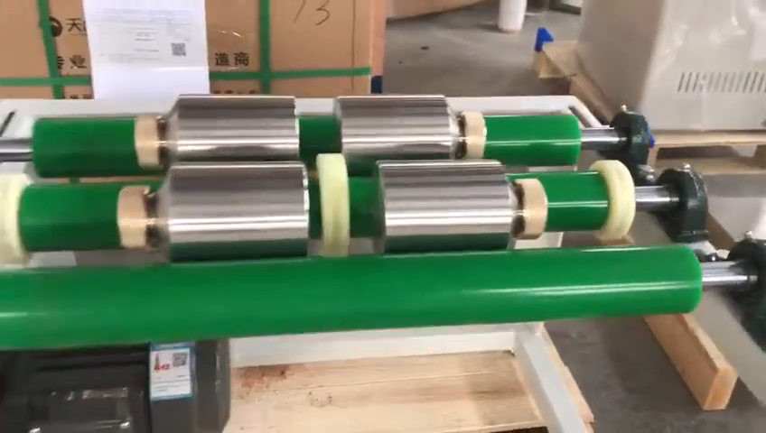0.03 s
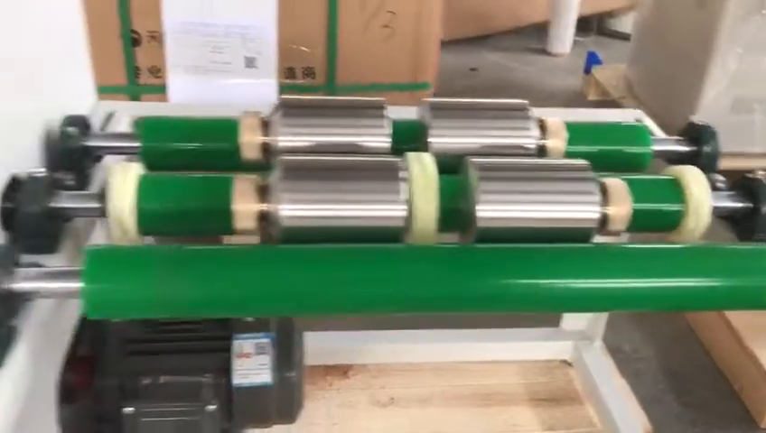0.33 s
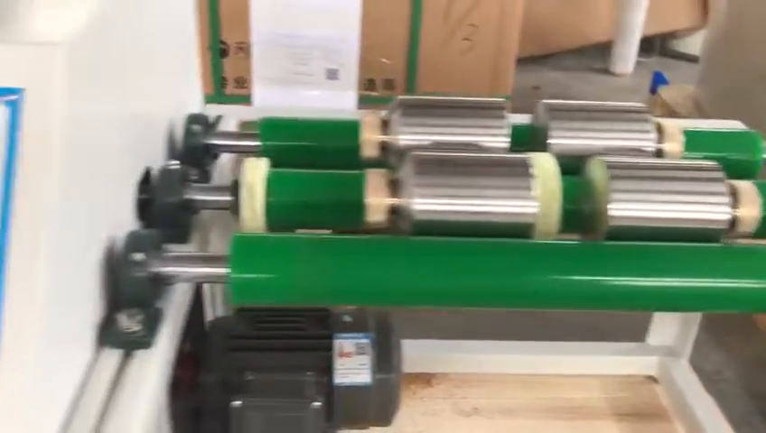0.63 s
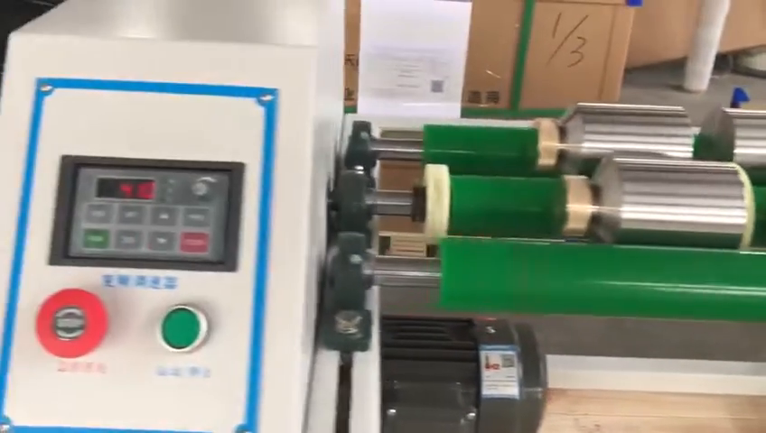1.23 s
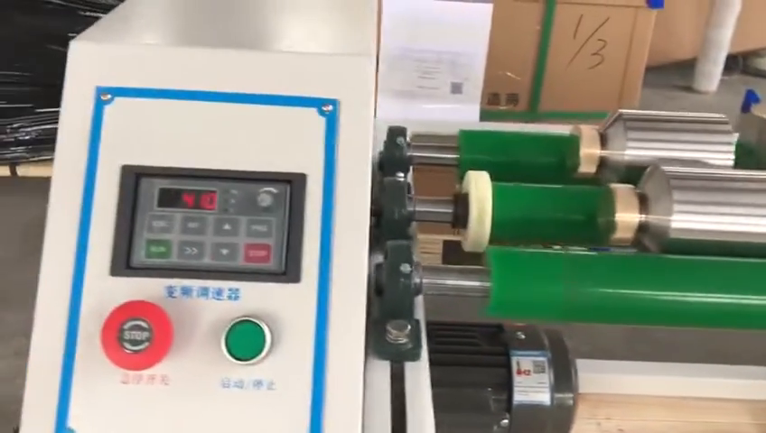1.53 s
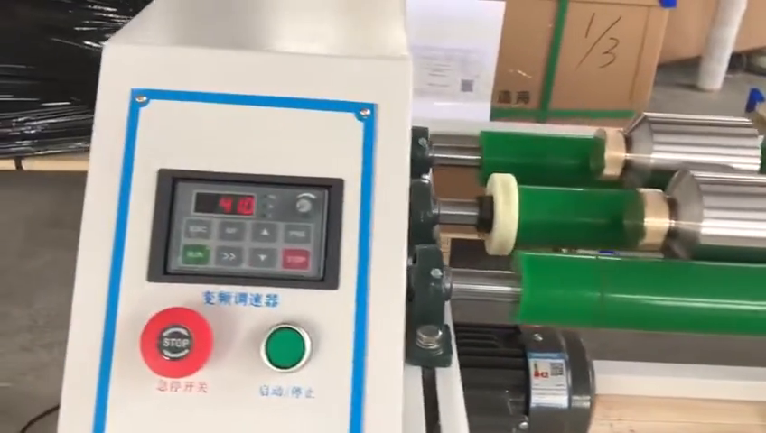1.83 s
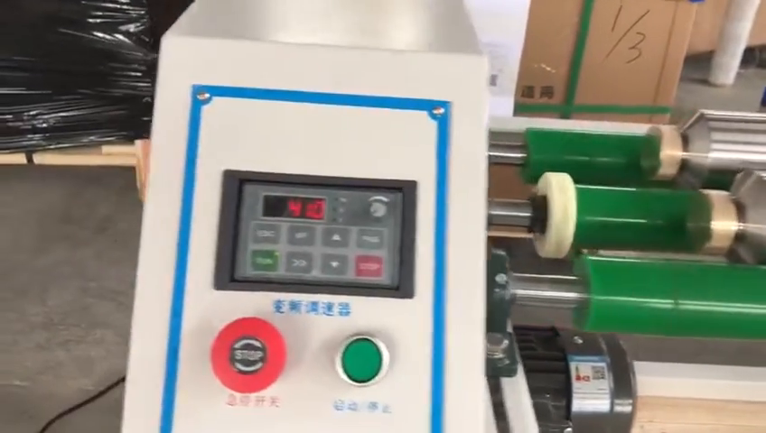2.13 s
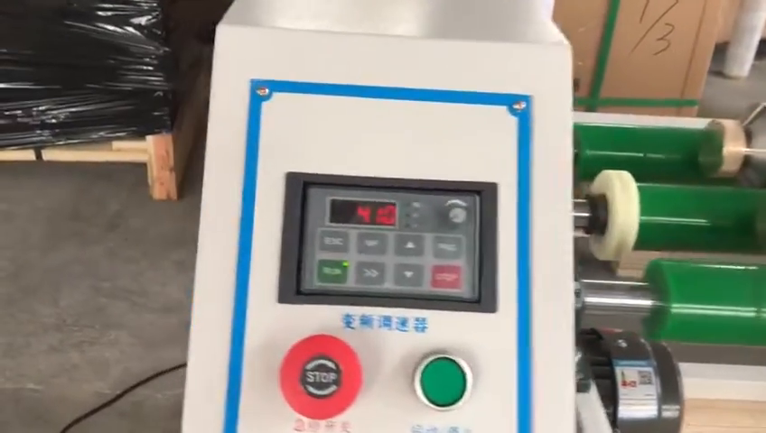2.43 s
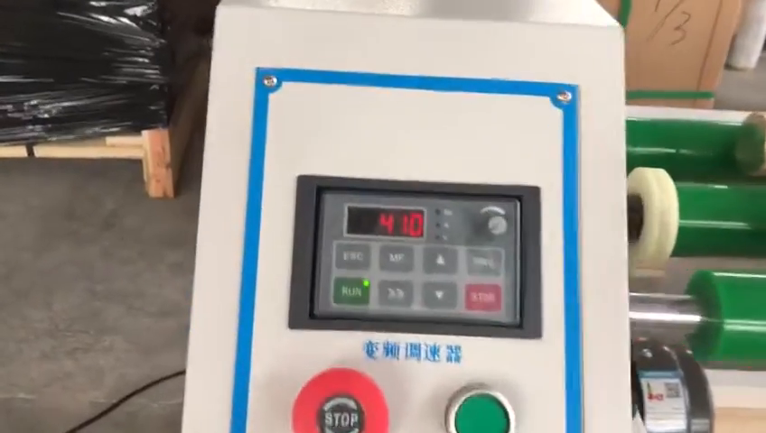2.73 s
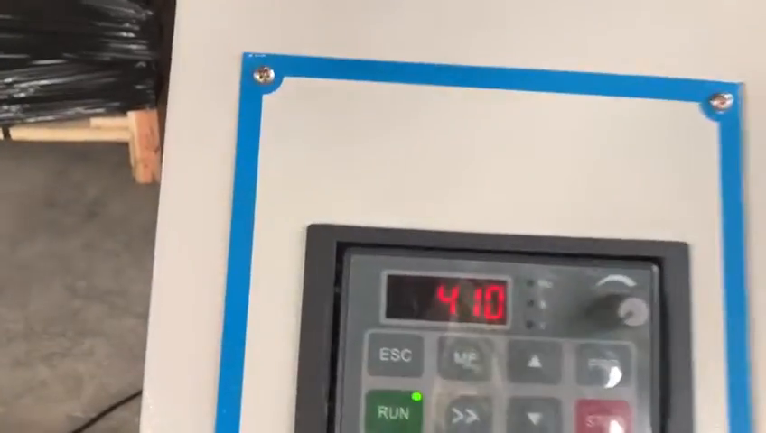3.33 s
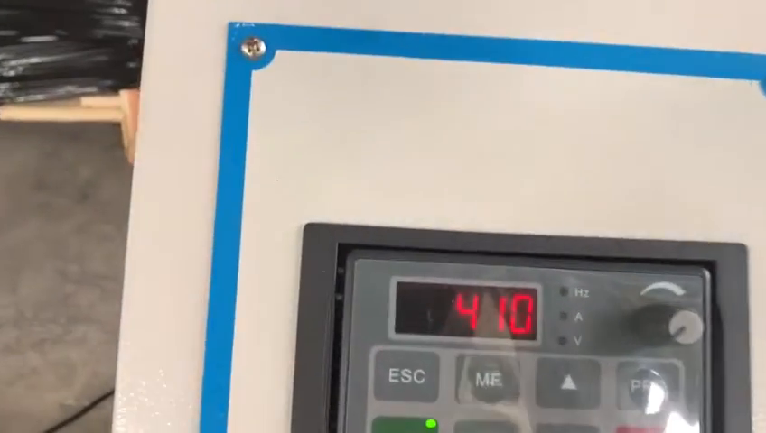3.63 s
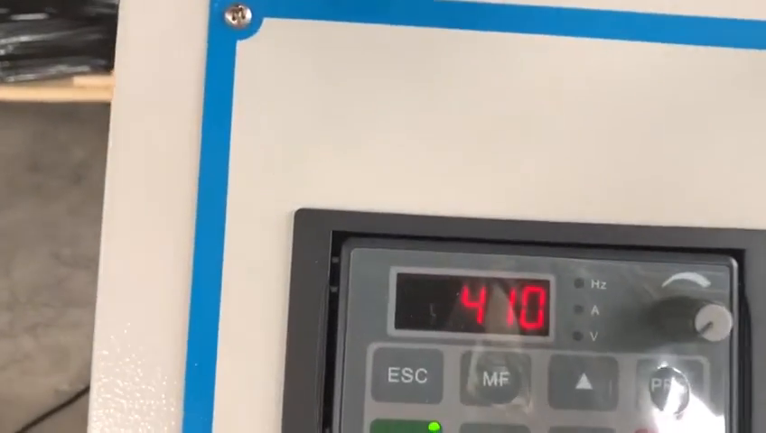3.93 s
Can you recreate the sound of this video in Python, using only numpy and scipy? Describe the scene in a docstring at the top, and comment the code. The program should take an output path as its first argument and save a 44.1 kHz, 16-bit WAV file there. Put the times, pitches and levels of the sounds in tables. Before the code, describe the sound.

A motor-driven jar mill runs for the whole four seconds, heard close in a workshop. Its motor hums and steel jars rumble on rubber rollers, while a thin, high whine fades in and out as the microphone moves. Faint, quick, even ticks and a soft bearing hiss continue underneath. A slight metal ring grows after about two seconds, and the jars knock a few times around 3.6 to 3.8 seconds.

```python
"""A thin, high whine in two clusters of lines, fading in and out over the rumble of a laboratory jar mill.
The microphone is a phone, carried through a workshop from the mill's rollers to its control box.
The inverter's switched current makes the motor whine; beneath that the motor hums, and steel jars
rumble on the rubber rollers, much alike on every turn, and knock a few times near the end.
In the background the frame rings, the bearings hiss and the drive ticks faintly."""
import sys
import numpy as np
from scipy import signal
from scipy.fft import rfft, irfft
from scipy.io import wavfile

SR = 44100
rng = np.random.default_rng(int(sys.argv[2]) if len(sys.argv) > 2 else 0)


def wav_out(sig):
    """Save sig, one row per channel (or a flat mono array), as 16-bit PCM at SR to the path in sys.argv[1]."""
    wavfile.write(sys.argv[1], SR, np.round(np.clip(np.atleast_2d(sig).T, -1, 1) * 32767).astype(np.int16))


N = 176400
TIME = np.arange(N) / SR
SWITCH_HZ, DRIVE_HZ = 6000, 49.85  # the inverter's switching rate and the motor's supply rate

# Swell of the weaker whine lines above the switching rate and of the weaker whistle lines,
# each shared by a faint haze: t/s, relative level/dB
WEAK_WHINE_SWELL = [(0.0, -46.5), (0.76, -46.5), (0.84, -53), (1.48, -45.5), (1.64, -50.5), (2.04, -47),
                    (2.12, -57.0), (2.24, -50), (2.76, -49), (3.92, -53.5), (4.0, -53)]
WEAK_WHISTLE_SWELL = [(0.0, -43), (0.6, -42.0), (0.68, -45.5), (0.8, -41.5), (0.92, -46.5), (1.32, -46.5),
                      (1.4, -44), (1.72, -46.5), (2.2, -42.5), (3.36, -49.5), (3.48, -47.5), (4.0, -53)]


def inverter():
    """Switched motor current sings around the switching rate (whine) and twice that rate (whistle)."""
    # Each loud sideband as the microphone moves, named for its nominal f/Hz: t/s, relative level/dB
    at_5200 = [(0.0, -50.5), (0.68, -56), (0.96, -70), (1.12, -52.5), (1.64, -46.5), (1.96, -47),
               (2.12, -66), (2.36, -48.5), (2.64, -61), (3.36, -49.5), (4.0, -50)]
    at_5300 = [(0.0, -56), (1.44, -58), (2.0, -48), (2.24, -62), (2.36, -58), (2.92, -50), (3.08, -62),
               (4.0, -48.5)]
    at_5950 = [(0.0, -45), (0.28, -47.5), (0.42, -66), (0.9, -46), (1.44, -44), (2.28, -49), (2.5, -61),
               (3.1, -54), (4.0, -63)]
    at_6250 = [(0.0, -64), (0.08, -57), (1.08, -51), (1.16, -73), (1.32, -53), (1.48, -76), (2.92, -48),
               (3.0, -71), (3.12, -48), (4.0, -56.5)]
    at_6700 = [(0.0, -49), (0.36, -42), (0.48, -56), (1.0, -49), (1.08, -56.5), (1.16, -47), (1.64, -50),
               (1.84, -65), (1.92, -50.5), (2.36, -47.5), (2.52, -55), (4.0, -56)]
    at_12300 = [(0.0, -55), (0.24, -45), (0.36, -63), (0.8, -52.0), (1.16, -44), (1.24, -56), (1.36, -38),
                (1.6, -49.5), (1.8, -42), (2.12, -45), (2.24, -43), (2.36, -60), (2.44, -47.0), (3.24, -56),
                (3.32, -51), (4.0, -56.0)]
    at_12850 = [(0.0, -47), (0.4, -57), (0.48, -44.0), (0.56, -44.0), (0.88, -51.5), (1.52, -49.5),
                (1.8, -63.5), (1.92, -53), (2.72, -51), (2.8, -61.5), (2.92, -49), (3.0, -61), (3.6, -48.5),
                (4.0, -62)]
    # Weaker sidebands, in groups: nominal f/Hz, relative level/dB
    low_whine_lines = [(5001, -74), (5103, -69), (5502, -54), (5604, -58), (5652, -73), (5749, -54),
                       (5852, -63)]
    whine_lines = [(6051, -53), (6099, -64), (6148, -64), (6347, -68), (6395, -56), (6449, -69),
                   (6498, -57), (6546, -66), (6799, -56), (6998, -69)]
    whistle_lines = [(10901, -73), (11052, -68), (11154, -58), (11353, -65), (11456, -55), (11601, -63),
                     (11649, -59), (11698, -55), (11752, -68), (11800, -52), (11902, -62), (11999, -62),
                     (12102, -63), (12199, -56), (12349, -60), (12398, -66), (12548, -60), (12645, -63),
                     (12748, -71), (12947, -66)]
    # Swell of the lowest group: t/s, relative level/dB
    low_whine_swell = [(0.0, -49.5), (0.2, -54), (0.95, -47), (1.1, -52), (1.84, -50), (2.04, -47.5),
                       (2.6, -50), (3.1, -57.5), (3.4, -52.5), (4.0, -57)]
    loud_whine = [(5200, at_5200), (5300, at_5300), (5950, at_5950), (6250, at_6250), (6700, at_6700)]
    loud_whistle = [(12300, at_12300), (12850, at_12850)]
    return (loud_lines(loud_whine, SWITCH_HZ)
            + undb(-.4) * loud_lines(loud_whistle, 2 * SWITCH_HZ)
            + undb(1.2) * cluster(low_whine_lines, SWITCH_HZ, low_whine_swell)
            + undb(1.14) * cluster(whine_lines, SWITCH_HZ, WEAK_WHINE_SWELL)
            + undb(.1) * cluster(whistle_lines, 2 * SWITCH_HZ, WEAK_WHISTLE_SWELL))


def loud_lines(lines, centre_hz):
    """The loud sidebands swell and sink one by one along the microphone's path."""
    return sum(follow(swell) * unit(sideband(hz, centre_hz).real) for hz, swell in lines)


def cluster(lines, centre_hz, swell, buzz_db=-29):
    """Weaker sidebands swell together and fade by chance; a faint drive-rate buzz fills the gaps."""
    gains = [undb(db) * fading(hz) for hz, db in lines]
    tones = sum(np.real(gain * sideband(hz, centre_hz)) for gain, (hz, _) in zip(gains, lines))
    power = sum(np.abs(gain) ** 2 for gain in gains)
    tones = unit(tones / power ** .35)  # evens out most of the joint fading
    first, last = (round((hz - centre_hz) / DRIVE_HZ) for hz in (lines[0][0], lines[-1][0]))
    cycle = np.linspace(0, 1, 900)
    one_cycle = sum(np.exp(2j * np.pi * (k * cycle + rng.random())) for k in range(first, last + 1))
    carrier = np.exp(2j * np.pi * centre_hz * TIME)
    buzz = np.real(np.interp(DRIVE_HZ * TIME % 1, cycle, one_cycle) * carrier)
    return follow(swell) * (tones + undb(buzz_db) * buzz)


def sideband(nominal_hz, centre_hz, flutter_hz=65, flutter_db=-16.5):
    """A complex tone a whole multiple of the drive rate from its centre, roughened by fast flutter."""
    hz = centre_hz + DRIVE_HZ * np.round((nominal_hz - centre_hz) / DRIVE_HZ)
    t = np.linspace(0, N / SR, 4000)
    f = np.fft.fftfreq(len(t), t[1])
    flutter = unit(np.fft.ifft(random_phases(len(t)) / (1 + (f / flutter_hz) ** 2)))
    envelope = np.interp(TIME, t, 1 + undb(flutter_db) * flutter)
    return envelope * np.exp(2j * np.pi * (hz * TIME + rng.random()))


def fading(hz, reflections=6, mic_m_s=.14, direct_share=.44):
    """Complex gain at the moving microphone: the direct path plus Doppler-shifted room reflections."""
    t = np.linspace(0, N / SR, 400)
    slant, start = rng.uniform(-1, 1, (2, reflections, 1))
    doppler_hz = slant * mic_m_s * hz / 343
    echoes = np.exp(2j * np.pi * (start + doppler_hz * t)).sum(0)
    gain = np.sqrt(direct_share) * random_phases() + np.sqrt(1 - direct_share) * unit(echoes)
    return np.interp(TIME, t, unit(gain))


def jars(turn_s=.209, split_hz=226):
    """Rolling shakes the frame into a low rumble and the jars into a lighter noise above it."""
    # Spectrum of steel rolling on rubber: f/Hz, relative density/dB
    spectrum = [(25, -80), (40, -81), (52, -67.5), (80, -72), (105, -59.5), (122, -58.5), (138, -68.5),
                (155, -61.5), (195, -70), (225, -75), (260, -68.5), (340, -65), (375, -70.5), (415, -79.5),
                (470, -75.5), (540, -71), (620, -68), (720, -76.5), (1100, -76.5), (1300, -85),
                (2000, -86.5)]
    # Rumble and lighter noise along the microphone's path: t/s, relative level/dB
    rumble_swell = [(0, -39), (1.0, -40.5), (1.8, -40.5), (2.45, -42), (3.1, -41), (3.65, -38.5),
                    (4, -39.5)]
    roll_swell = [(0, -46), (1.0, -46.5), (2.3, -47.5), (3.0, -46.5), (3.55, -46.5), (3.66, -44.5),
                  (3.85, -46.5), (4, -45)]
    low_share = lambda f: 1 / (1 + (f / split_hz) ** 12)
    rumble = shape(contact(turn_s, .6), lambda f: colour(f, spectrum) * np.sqrt(low_share(f)))
    roll = shape(contact(turn_s, .3), lambda f: colour(f, spectrum) * np.sqrt(1 - low_share(f)))
    return follow(rumble_swell) * unit(rumble) + undb(2.5) * follow(roll_swell) * unit(roll)


def contact(turn_s, repeat_share):
    """Roughness under the jars: a share of its power comes round on every turn, the rest is new."""
    size = int(turn_s * SR)
    one_turn = irfft(random_phases(size // 2 + 1), size)
    repeating = unit(np.resize(one_turn, N))
    return np.sqrt(repeat_share) * repeating + np.sqrt(1 - repeat_share) * rng.standard_normal(N)


def motor():
    """Magnetic hum, and three clear tones that swell and sink as the microphone moves."""
    # Steady hum of motor and frame: f/Hz, level/dB
    hum_lines = [(50.6, -59.5), (99.8, -47), (600, -62.5), (648, -57)]
    # The three clear tones at the microphone: t/s, relative level/dB
    low_swell = [(0.0, -46.5), (0.27, -46), (1.17, -47), (1.21, -43.5), (2.29, -49), (4.0, -51)]
    middle_swell = [(0.0, -58.5), (1.2, -53), (2.32, -50.5), (3.0, -54.5), (3.5, -56.5), (3.65, -64),
                    (4.0, -60)]
    high_swell = [(0.0, -49), (0.54, -53.5), (0.99, -48.5), (1.65, -56), (1.85, -56.5), (2.4, -60.5),
                  (2.75, -56.5), (2.9, -54.5), (3.31, -51.5), (3.43, -57), (4.0, -56)]
    return (sum(undb(db) * motor_tone(hz) for hz, db in hum_lines)
            + follow(low_swell) * motor_tone(hz=299.8)
            + undb(-1) * follow(middle_swell) * motor_tone(hz=1196)
            + undb(.8) * follow(high_swell) * motor_tone(hz=1744))


def motor_tone(hz, sway_db=1.4, wobble_rad=.22):
    """A motor line that wavers a little in pitch and level with the load and drifts slowly."""
    drift_rad = 1.56 * hz / 1196 * wander(.46)  # higher lines drift further
    sway = undb(sway_db * wander(12))
    phase = 2 * np.pi * hz * TIME + wobble_rad * wander(8.9) + drift_rad
    return unit(sway * np.sin(phase))


def knocks(width_share=.3):
    """The jars knock and clatter briefly on the rollers, each blow a broad band around its pitch."""
    # Blows of the jars: t/s, level/dB, f/Hz, decay/s
    blows = [(3.603, -33, 350, .006), (3.812, -30, 320, .005), (3.625, -49, 1550, .03),
             (3.648, -44, 950, .012), (3.735, -47, 980, .03)]
    return sum(undb(db) * burst(at, decay_s, lambda f: np.exp(-((f / hz - 1) / width_share) ** 2))
               for at, db, hz, decay_s in blows)


def drive_ticks(first_s=.02, every_s=.0686, decay_s=.0055, scatter_hz=60):
    """The drive ticks at an even pace, now and then louder; each tick rings a little differently."""
    # The louder ticks: t/s, relative level/dB, brightness/(dB per octave)
    accents = [(0.2433, -45, 7), (0.9956, -39.5, -3), (1.3977, -42, -5), (1.8058, -46, -2),
               (2.0622, -45, 0), (2.2154, -41.5, -3), (2.2837, -46, 0), (2.4917, -49, 0),
               (2.8285, -44.5, 0), (3.039, -39.5, -3), (3.1765, -40, 2), (3.245, -43.5, 6),
               (3.3822, -42, 3), (3.4511, -45, -2), (3.5872, -42, -2), (3.654, -40.5, 9), (3.7244, -40, -2),
               (3.8616, -40, -7)]
    # Resonances that a tick excites: f/Hz, width/Hz, relative level/dB
    modes = [(1520, 420, -3), (2420, 250, 3.5), (2980, 300, -4), (3650, 450, -8), (4380, 170, -6)]
    beats = np.arange(first_s, N / SR, every_s)
    free_beats = [at for at in beats if min(abs(at - row[0]) for row in accents) > every_s / 2]
    faint = [(at, -52 + 5 * rng.uniform(-1.1, 1), 0) for at in free_beats]
    loud = [(at, db - 2.5, tilt) for at, db, tilt in accents]
    hz, width, mode_db = np.array(modes).T[:, :, None]
    ticks = 0
    for at, db, tilt in faint + loud:
        centre = hz + scatter_hz * rng.standard_normal(hz.shape)
        gain = undb(mode_db + tilt * np.log2(hz / hz[0]))
        body = lambda f: (gain * np.exp(-((f - centre) / width) ** 2)).sum(0)
        ticks += undb(db) * burst(at, decay_s, body)
    return ticks


def burst(at, decay_s, body, attack_s=.0015, room_s=.049, room_db=-12.5):
    """One blow: noise in the body's resonances dies fast and leaves a short tail in the workshop."""
    t = np.arange(8192) / SR
    f = np.fft.rfftfreq(len(t), 1 / SR)
    noise = unit(irfft(body(f) * random_phases(len(f))))
    attack = 1 - np.exp(-t / attack_s)
    envelope = attack * (np.exp(-t / decay_s) + undb(room_db) * np.exp(-t / room_s))
    blow = unit(noise * envelope) * np.sqrt(np.mean(envelope ** 2))
    return np.concatenate([np.zeros(int(at * SR)), blow, np.zeros(N)])[:N]


def frame(hz=420.7, width_hz=11.4):
    """One narrow resonance of the frame, shaken by the rolling and plainer close to the control box."""
    # The ring at the microphone: t/s, relative level/dB
    swell = [(0, -52.5), (2.05, -55), (2.35, -46.5), (2.9, -51), (3.3, -46.5), (4, -45.5)]
    ring = band_noise(lambda f: 1 / (1 + ((f - hz) / width_hz) ** 2))
    return undb(-3.5) * follow(swell) * ring


def bearings():
    """Bearings and motor hiss smoothly, sinking a little on the way to the control box."""
    # Spectrum of the hiss: f/Hz, relative density/dB
    spectrum = [(900, -105), (1300, -90.5), (2000, -90), (2350, -87.5), (3300, -94.5), (3900, -95),
                (4400, -88.5), (4850, -99), (7000, -102), (7700, -112), (8600, -102), (10400, -103.5),
                (14000, -109)]
    # The hiss at the microphone: t/s, level/dB
    level = [(0, -53), (1.5, -54), (3.0, -55), (4, -55.5)]
    return follow(level) * band_noise(lambda f: colour(f, spectrum))


def inverter_haze():
    """Two faint bands of noise rise and fall with the weaker lines of the upper whine and the whistle."""
    haze = lambda hz, width_hz: band_noise(lambda f: np.exp(-((f - hz) / width_hz) ** 4))
    return (undb(-15) * follow(WEAK_WHINE_SWELL) * haze(5900, 800)
            + undb(-20) * follow(WEAK_WHISTLE_SWELL) * haze(12150, 1050))


def undb(db):
    """Decibels to gain."""
    return 10 ** (np.asarray(db) / 20)


def unit(x):
    """Scale to rms 1."""
    return x / np.sqrt(np.mean(np.abs(x) ** 2))


def follow(curve):
    """Gain over time from rows of t/s, level/dB."""
    return undb(np.interp(TIME, *np.array(curve).T))


def shape(x, gain):
    """Filter by a gain given as a function of frequency."""
    return irfft(rfft(x) * gain(np.arange(N // 2 + 1) * SR / N + 1e-3), N)


def colour(f, points):
    """Gain from rows of f/Hz, level/dB, falling away beyond their ends."""
    hz, db = np.array(points).T
    ends = np.minimum(1, f / hz[0]) ** 2 * np.minimum(1, hz[-1] / f) ** 4
    return undb(np.interp(np.log(f), np.log(hz), db)) * ends


def band_noise(gain):
    """Noise of rms 1, shaped by a gain over frequency."""
    return unit(shape(rng.standard_normal(N), gain))


def wander(rate_hz):
    """Slow random motion of rms 1."""
    return band_noise(lambda f: np.exp(-(f / rate_hz) ** 2))


def random_phases(count=None):
    """Complex numbers of size 1 and random angle."""
    return np.exp(2j * np.pi * rng.random(count))


def scene():
    """The whole mill at one moving microphone, in mono."""
    mill = inverter() + jars() + motor() + knocks() + drive_ticks()
    background = frame() + bearings() + inverter_haze()
    return (mill + background)[None]


def record(dry):
    """The phone cuts the top of the treble steeply."""
    top_hz = 14000
    return signal.sosfilt(signal.ellip(8, .2, 70, top_hz, fs=SR, output="sos"), dry)


dry = scene()
out = record(dry)
wav_out(out)
```